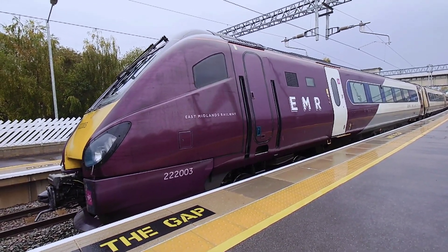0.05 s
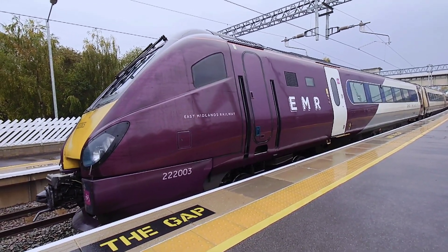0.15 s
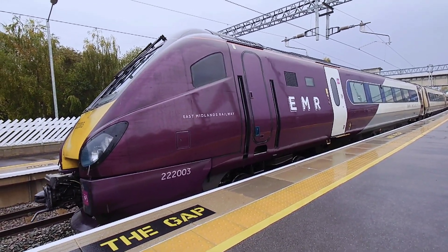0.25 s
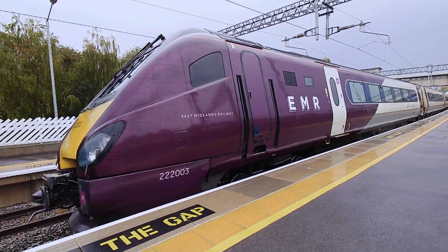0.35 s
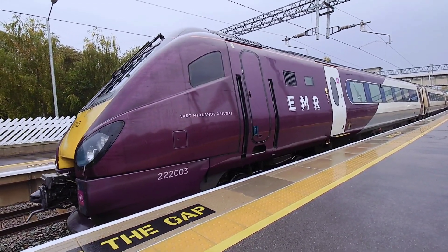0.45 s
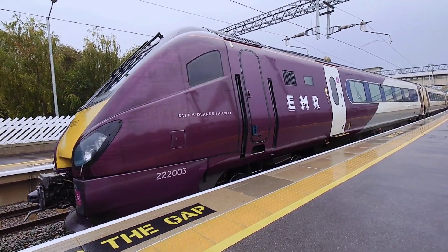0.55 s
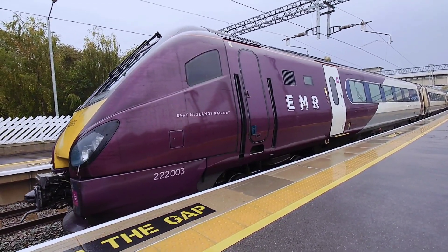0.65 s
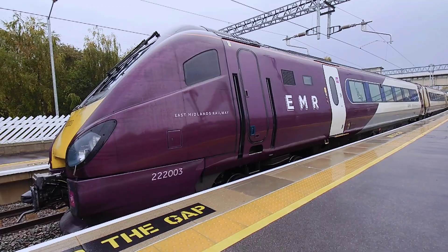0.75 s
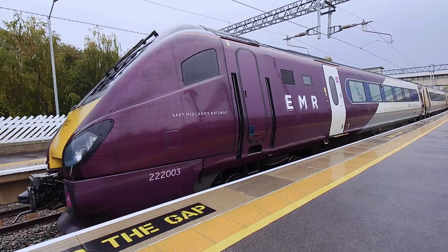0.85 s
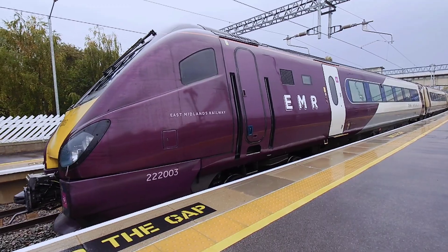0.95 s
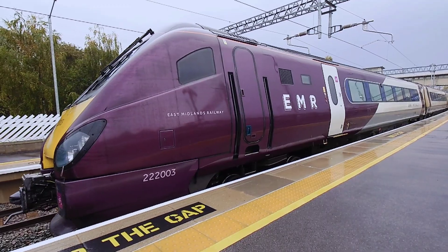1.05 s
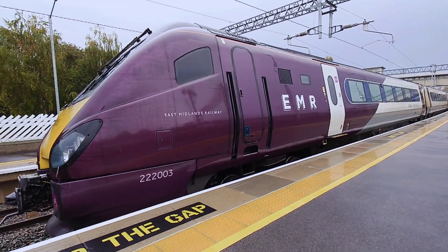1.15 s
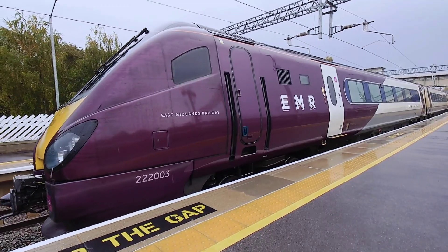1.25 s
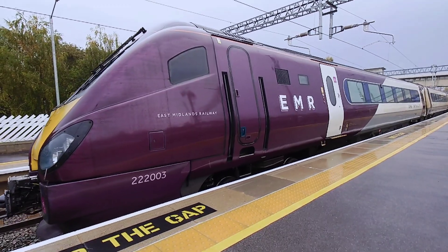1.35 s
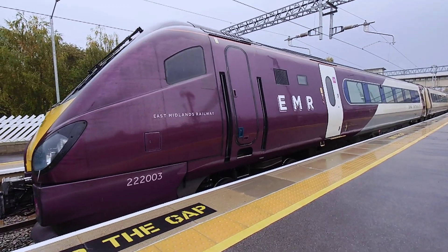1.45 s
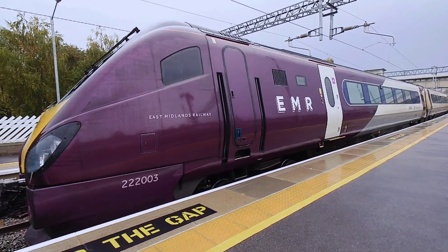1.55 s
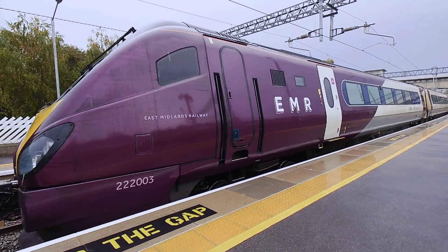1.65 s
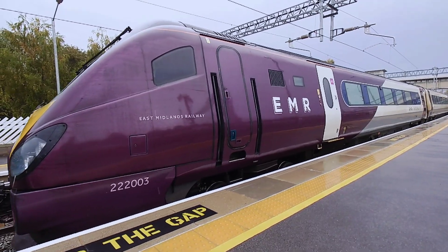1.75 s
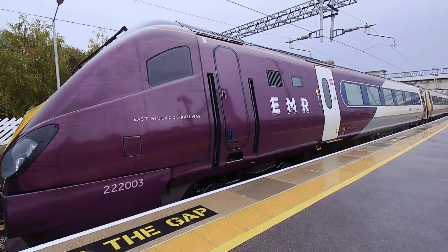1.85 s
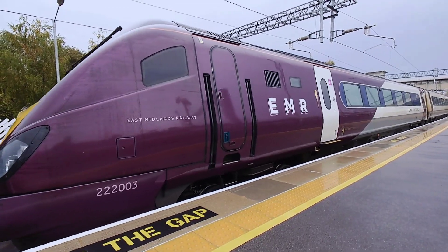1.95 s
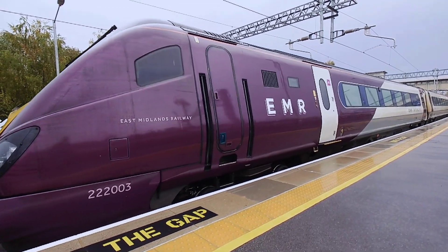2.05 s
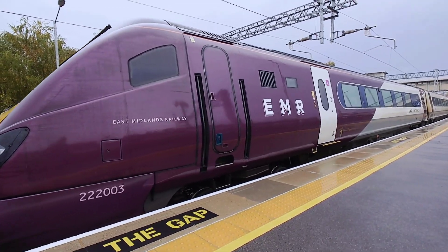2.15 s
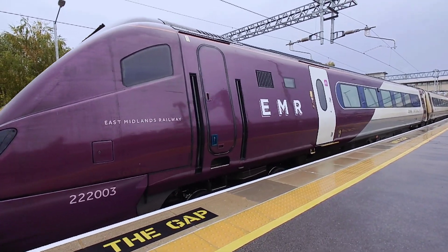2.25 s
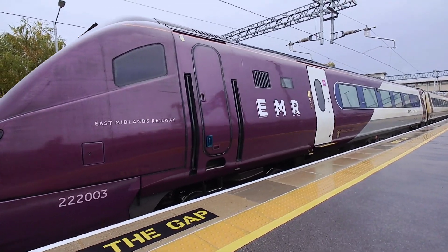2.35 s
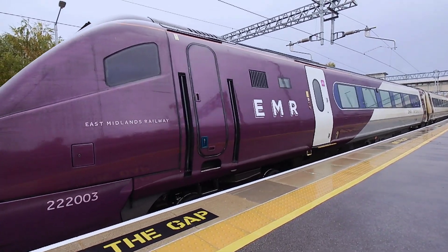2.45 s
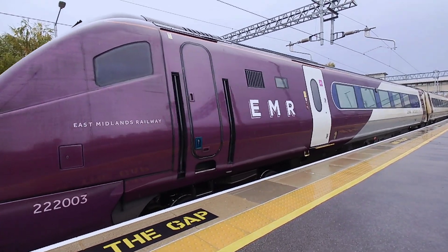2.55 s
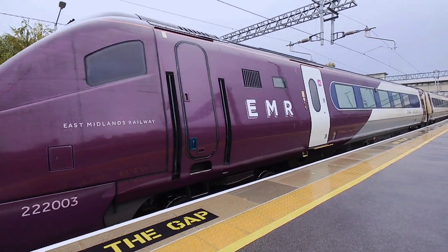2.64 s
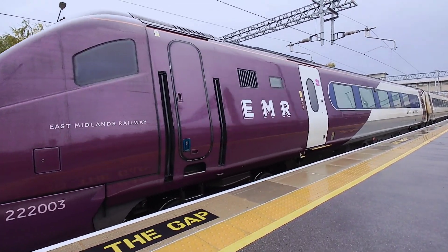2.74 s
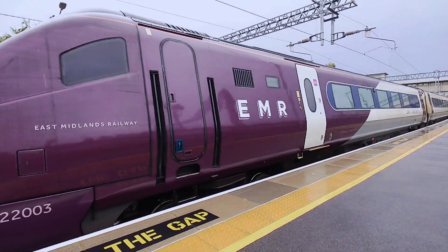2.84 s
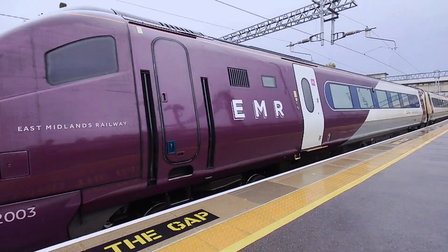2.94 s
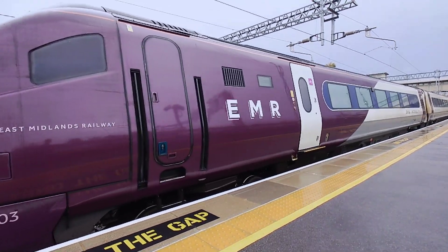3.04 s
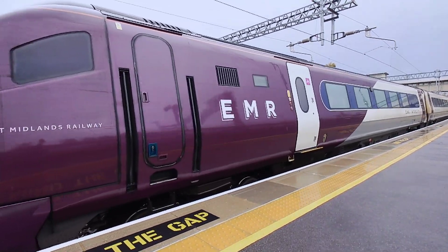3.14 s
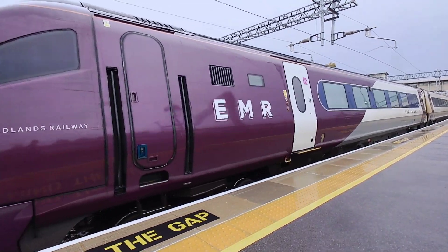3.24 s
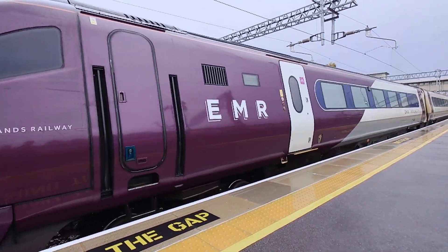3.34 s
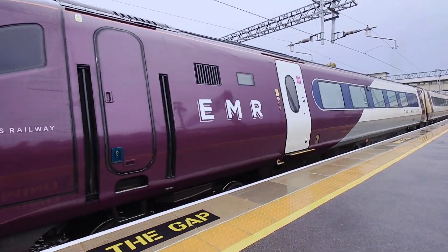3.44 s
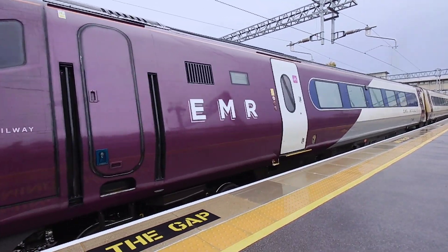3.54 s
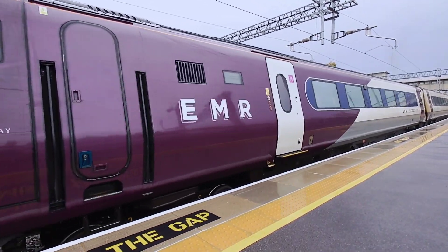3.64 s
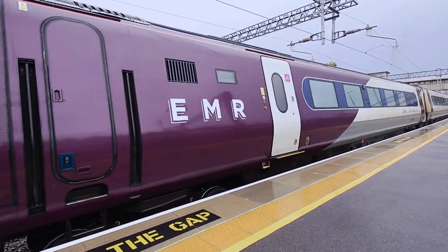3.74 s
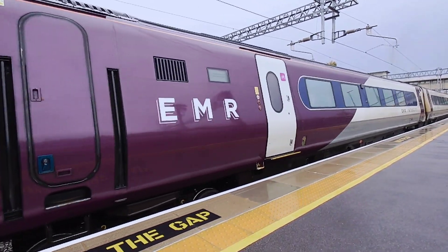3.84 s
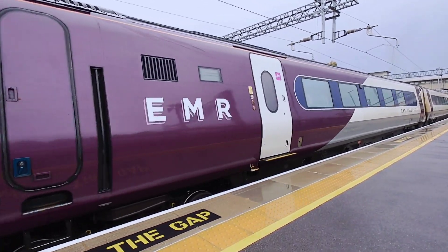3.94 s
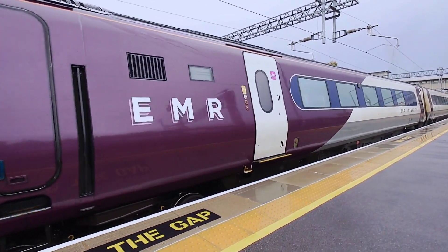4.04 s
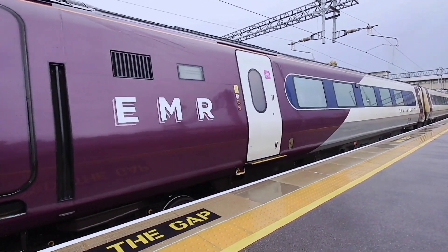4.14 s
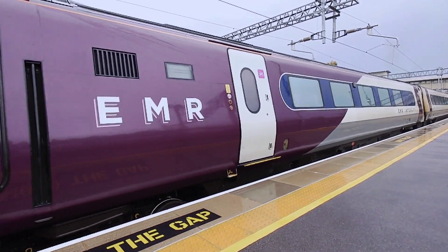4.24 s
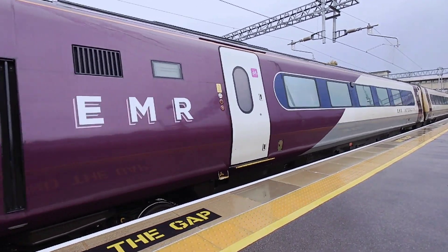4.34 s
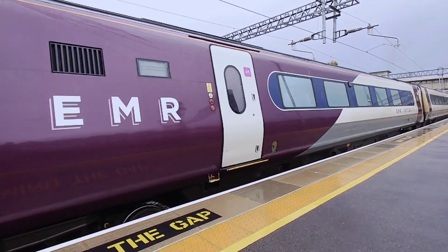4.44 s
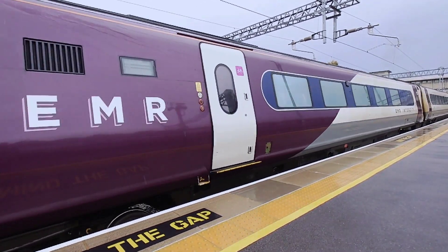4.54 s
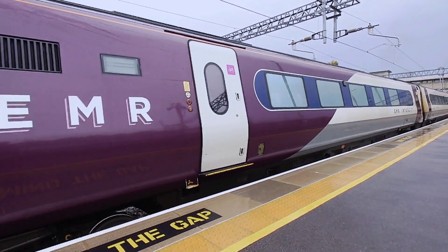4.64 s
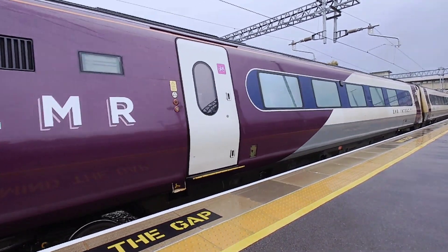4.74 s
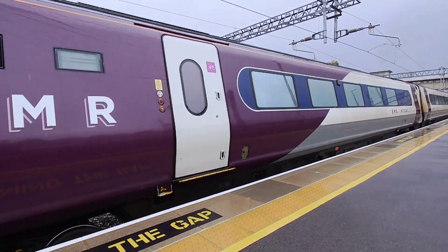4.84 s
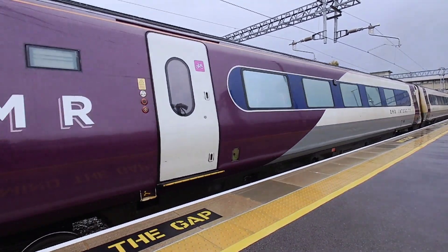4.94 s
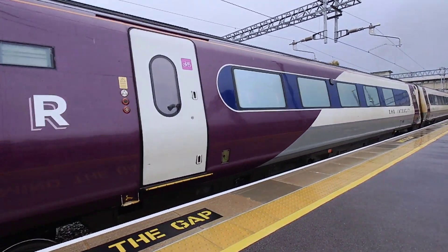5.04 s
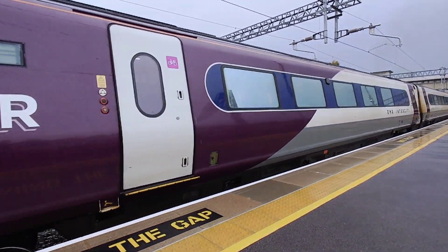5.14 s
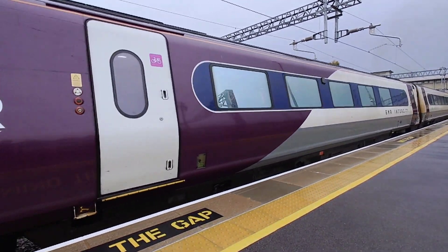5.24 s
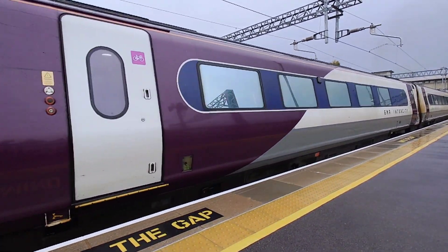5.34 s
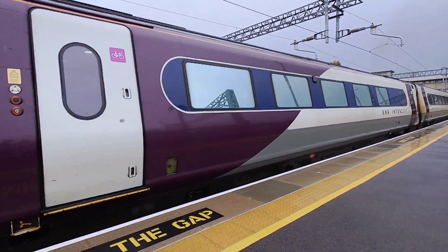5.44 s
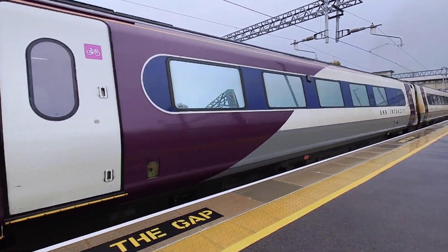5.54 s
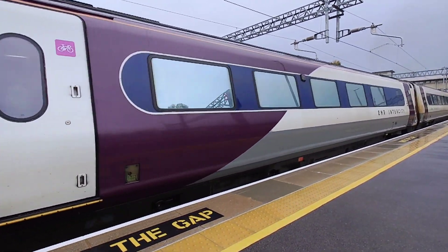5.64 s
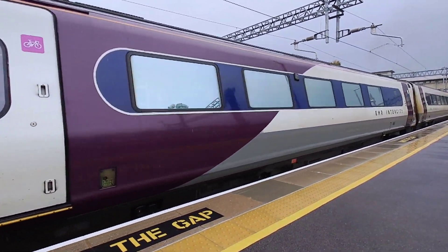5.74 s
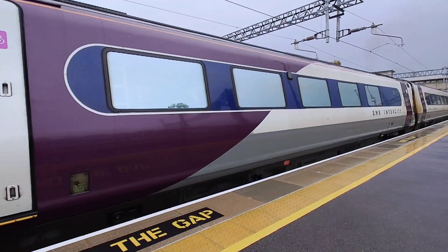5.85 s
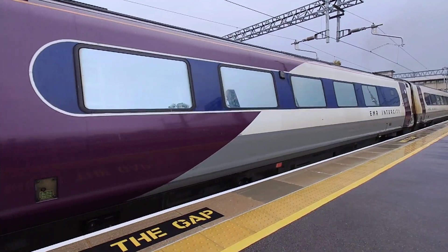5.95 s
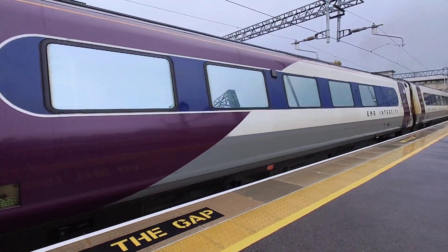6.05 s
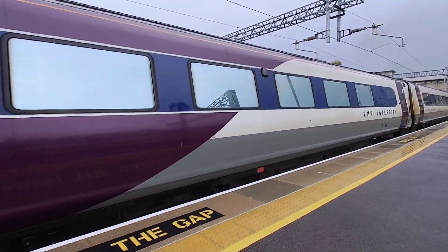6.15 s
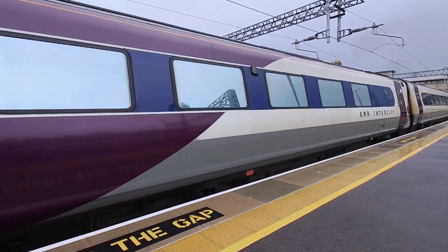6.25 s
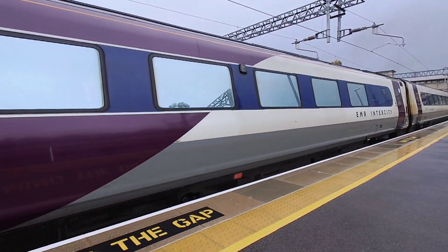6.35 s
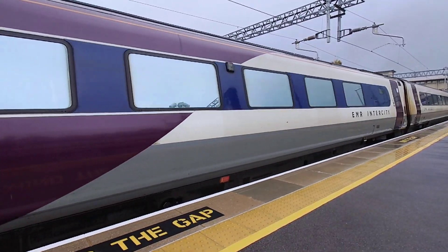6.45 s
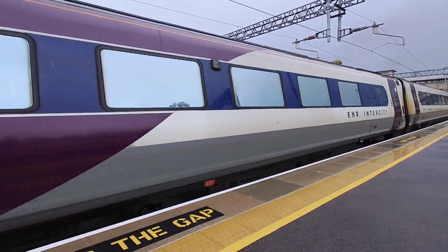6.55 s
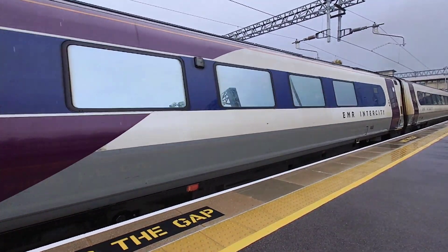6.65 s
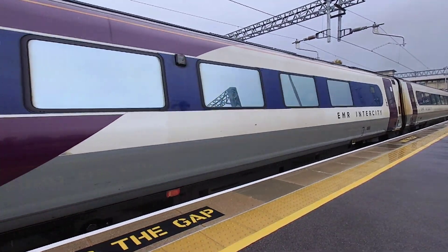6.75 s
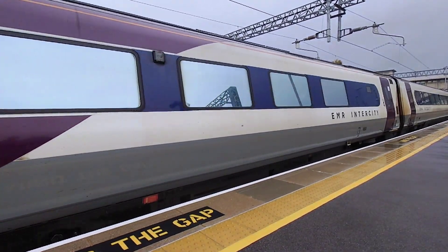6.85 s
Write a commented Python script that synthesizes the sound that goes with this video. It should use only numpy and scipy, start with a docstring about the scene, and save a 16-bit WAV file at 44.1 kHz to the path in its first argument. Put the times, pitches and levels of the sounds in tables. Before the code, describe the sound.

A diesel train idles with a deep drone beside a station platform, close to the microphone. After about a second it revs up, the pitch climbing steadily as the engine's roar and rumble grow louder and nearer. Midway, a short low hum and a brief hiss of air pass by. A faint rising whistle follows, over a steady hum and a thin electrical whine, while the train keeps accelerating.

```python
"""On a station platform, a diesel railcar revs up and pulls out close to a two-port microphone.
The exhaust drones at the rate the cylinders fire, and the engine under the floor roars louder
as it draws near. A slower machine passes with a short low hum, a leaking air fitting hisses by,
and the generator, converter and turbocharger sing above the engines farther down the train."""
import sys
import numpy as np
from scipy import signal
from scipy.fft import rfft, irfft, next_fast_len
from scipy.io import wavfile
from scipy.ndimage import uniform_filter1d

SR = 44100
rng = np.random.default_rng(int(sys.argv[2]) if len(sys.argv) > 2 else 0)


def generate_wav(signal):
    """Clip the signal to [-1, 1] and save it as 16-bit WAV at the path in sys.argv[1]."""
    frames = np.transpose(np.atleast_2d(signal))
    scaled = np.clip(frames, -1, 1) * 32767
    pcm = np.round(scaled).astype(np.int16)
    wavfile.write(sys.argv[1], SR, pcm)


N = 303849
TIME = np.arange(N) / SR


# How often the cylinders fire: t/s, f/Hz
FIRING_RATE = [(0, 56.93), (1, 56.91), (1.5, 58.9), (2, 61.18), (3, 67.05), (3.5, 69.39), (4.3, 71.62),
               (6, 79), (6.89, 83.5)]
# The drone at 1, 2 and 3 times the firing rate: t/s, level/dB, level/dB, level/dB
DRONE_LEVELS = [(0, -22, -43, -34.5), (1.05, -20, -40.5, -27), (1.45, -22.5, -31.5, -34),
                (1.72, -28.5, -30, -29), (1.97, -34, -24, -36), (2.5, -32, -20.5, -25),
                (3.05, -21, -19, -32.5), (3.3, -26.5, -14.5, -24), (3.6, -29, -14, -31),
                (4.0, -23.5, -17.5, -28.5), (4.42, -14.5, -19.5, -32.5), (5.0, -13.5, -16.5, -39.5),
                (5.9, -13, -16.5, -33), (6.4, -21.5, -17.5, -30), (6.89, -21.5, -14.5, -26.5)]
# A second engine's note falls behind the first's: t/s, lag/turns, strength next to the first
SECOND_ENGINE = [(3.4, 0, 0.64), (3.9, .5, .8), (4.5, 1.5, 0.79), (5.36, 2.5, 0.61), (5.79, 3.5, 0.75),
                 (6.13, 4.5, 0.35), (6.4, 5.5, 0.91), (6.65, 6.5, 0.51), (6.89, 7.52, .7)]

def exhaust():
    """Exhaust puffs blend into a drone. A second engine weakens one note when half a turn out of step."""
    turns = np.cumsum(follow(FIRING_RATE)[0]) / SR
    peaks = np.sqrt(2) * amp(follow(DRONE_LEVELS))
    drone = sum(peak * np.cos(2 * np.pi * k * turns) for k, peak in enumerate(peaks, 1))
    lag, strength = follow(SECOND_ENGINE)
    return drone + strength * peaks[1] * np.cos(2 * np.pi * (2 * turns - lag))


# Notes that sound all the time: multiple of the engine cycle, level/dB before the boost
UNEVEN_NOTES = [(4, -47), (8, -54), (10, -44), (14, -41.5), (15, -39), (16, -37), (20, -46.5), (21, -50.5),
                (22, -44), (24, -46), (26, -43.5), (28, -44.5)]
# Boost to those notes and the rumble as the engine works harder: t/s, level/dB
EFFORT_BOOST = [(0, -3), (3.5, 0.5), (4.1, 3.5), (6.89, 5.5)]
# Notes that come and go: loudest t/s, multiple of the engine cycle, half-width/s, level/dB
SWELLING_NOTES = [(.4, 14, 1, -32), (.8, 252, .3, -55), (4.3, 54, .4, -48), (.9, 72, 0.64, -49),
                  (.95, 93, 0.61, -47.5), (4.7, 26, 0.38, -36), (5.12, 84, 0.16, -41.5),
                  (6.3, 168, 0.27, -45.5), (6.45, 22, 0.3, -31), (6.5, 10, 0.37, -24),
                  (6.55, 40, 0.44, -40), (6.56, 84, 0.45, -49), (6.75, 48, .2, -38.5)]

def uneven_cylinders():
    """No two cylinders fire alike, which adds notes at multiples of the whole four-stroke cycle."""
    cycle_hz = follow(FIRING_RATE)[0] / 6  # six firings to a cycle
    lasting = sum(note(k * cycle_hz, db, blur_hz=1.3, waver_db=3) for k, db in UNEVEN_NOTES)
    passing = sum(swell(s, half) * note(k * cycle_hz, db, blur_hz=1.57, waver_db=1.5)
                  for s, k, half, db in SWELLING_NOTES)
    return amp(follow(EFFORT_BOOST)[0]) * lasting + passing


# The tone of the rumble: f/Hz, relative level/dB
RUMBLE_TONE = [(20, -30), (45, -9), (70, 4), (100, 5.5), (150, 5.5), (300, 0), (400, -3.5), (500, -34.5)]

def rumble():
    """A deep noise that grows as the engine works harder."""
    return amp(-29.5 + follow(EFFORT_BOOST)[0]) * noise(RUMBLE_TONE, patchy_db=2)


# The tone of the nearest engine's roar: f/Hz, relative level/dB
ROAR_TONE = [(300, -22), (420, 2.5), (500, -11), (670, -0.5), (870, -13.5), (1080, -0.5), (1350, -13.5),
             (2250, -9), (3040, -18.5), (3500, -13), (4180, -14.5), (15000, -25)]

def near_engine():
    """The engine under the floor gets louder as it revs up and rolls closer."""
    start_m, aside_m, start_m_per_s, speed_up_m_per_s2 = 14.86, 2.92, 0.45, 0.47
    along_m = start_m - start_m_per_s * TIME - 0.5 * speed_up_m_per_s2 * TIME ** 2
    distance_m = np.hypot(aside_m, along_m)
    firing_hz, = follow(FIRING_RATE)
    db_at_1_m = -24 + 0.2864 * (firing_hz - firing_hz[0])
    return amp(db_at_1_m) / distance_m * noise(ROAR_TONE, patchy_db=0.63)


# The pump's two notes: multiple of its pitch, loudest t/s, half-width/s, level/dB
PUMP_HUM = [(1, 3.93, 0.24, -20.5), (3, 4.15, 0.13, -20.5)]

def pump():
    """A slower machine under the floor hums briefly as it passes, speeding up."""
    hz = 60.8 + 12.5 * (TIME - 3.95)
    return sum(swell(s, half) * note(k * hz, db, blur_hz=0.53) for k, s, half, db in PUMP_HUM)


# The tone of the hiss: f/Hz, relative level/dB
HISS_TONE = [(300, -30), (650, 4.5), (4000, -7.5), (15000, -13)]
# The leak's whistles: f/Hz when nearest, width/Hz, level/dB before the passing swell
LEAK_WHISTLES = [(3850, 160, -54), (7930, 190, -48), (10070, 170, -47), (14150, 300, -45)]

def air_leak():
    """Air hisses out of a fitting. Its whistles are loudest and dip in pitch when it is nearest."""
    full_s, shaded_s, nearest_s = 4.01, 4.24, 4.16
    rise_db = -51 * np.maximum(full_s - TIME, 0)
    fall_db = -95 * np.maximum(TIME - shaded_s, 0)
    air = amp(-34.5 + rise_db + fall_db) * noise(HISS_TONE, patchy_db=1)
    closeness = 1 / (1 + ((TIME - nearest_s) / 0.05) ** 2)
    bend = 1 + 0.012 * (1 - closeness)
    passing = amp(5) * np.sqrt(closeness) * swell(nearest_s, 0.55)
    for hz, width_hz, db in LEAK_WHISTLES:
        air += amp(db) * passing * fuzzy_whistle(hz * bend, width_hz)
    return air


# The generator's lasting notes: multiple of its pitch, level/dB
GENERATOR_NOTES = [(1, -41), (2, -55), (4, -53), (5, -60), (6, -61)]
# Swells added to them: multiple of its pitch, loudest t/s, half-width/s, level/dB
GENERATOR_SWELLS = [(1, 1.7, 0.24, -39.5), (4, 3.7, 0.18, -48.5), (4, 4.6, .25, -50), (2, 4.9, .6, -52),
                    (5, 4.7, 0.15, -47.5), (5, 5.52, 0.38, -50), (1, 5.73, 0.17, -34.5),
                    (4, 5.87, 0.26, -53), (4, 6.33, .15, -38), (1, 6.55, 0.46, -33.5)]

def generator(pitch_hz=380.2):
    """The generator hums at one pitch, and its notes swell now and then."""
    hum = np.zeros(N)
    for k, steady_db in GENERATOR_NOTES:
        swells = sum(amp(db) * swell(s, half) for m, s, half, db in GENERATOR_SWELLS if m == k)
        hum += (amp(steady_db) + swells) * note(k * pitch_hz, 0, blur_hz=1, waver_db=2)
    return hum


# The converter's high notes: f/Hz, level/dB before the load is added
CONVERTER_NOTES = [(2702, -60), (5400, -59), (8115, -64), (13530, -62)]
# How the load turns them up: t/s, added level/dB
LOAD_BOOST = [(.5, -9), (3, 0), (5, 1)]

def converter():
    """The power converter's thin whine comes up with the load."""
    load_db, = follow(LOAD_BOOST)
    return sum(note(hz, db + load_db, blur_hz=12, waver_db=3) for hz, db in CONVERTER_NOTES)


# How loud the turbocharger is: t/s, level/dB
TURBO_LEVEL = [(4.3, -66), (4.8, -51.5), (5.5, -50.5), (5.8, -62), (6.89, -50)]

def turbocharger():
    """The turbocharger gives a faint whistle that climbs steadily in pitch."""
    hz = 4440 + 690 * (TIME - 4.8)
    return note(hz, follow(TURBO_LEVEL)[0], blur_hz=16, waver_db=2.5)


# The tone of the engines down the train: f/Hz, relative level/dB
FAR_TONE = [(300, -5.5), (420, 0.5), (530, -8), (700, -4), (900, -4.5), (1400, -18.5), (1690, -4.5),
            (1990, -21), (2350, -10), (2900, -20.5), (3380, -12), (3750, -19.5), (15000, -36)]

def far_engines():
    """The engines down the train blend into a rush that slowly grows."""
    return amp(-39 + 0.43 * TIME) * noise(FAR_TONE, patchy_db=0.9)


# The left port next to the right: f/Hz, noise likeness (0-1), level/dB, head start/radians
LEFT_PORT = [(50.2, 0.98, 6, 1.06), (73.6, 0.9, 5.5, -0.07), (114.6, 0.72, -2, 1.22),
             (186, 0.99, -3, -1.18), (371, 1, -3, 0.8), (513, 0.45, -3, -1.25), (676, 0.76, 0, 0.5),
             (883, 0.54, -0.5, -2), (1510, 0.61, -2.5, 4), (2560, 0, -4, 5.5), (3230, 0.55, -1.5, 10),
             (5850, 0, -9, 18), (7200, .1, -27.5, 24), (11000, .1, -14.5, 33.5)]
# How the microphone colours the high sounds: f/Hz, level/dB
MIC_TONE = [(4000, 0.5), (5000, -0.5), (5700, -6.5), (6500, -6.5), (7050, -11), (8000, -3), (9300, -2.5),
            (10400, -8.5), (12700, -5), (15500, -7.5)]

def microphone(notes, noises):
    """Two openings, or ports: the left hears a shaded, shifted, partly unrelated version of the right."""
    size = next_fast_len(N)
    hz = np.fft.rfftfreq(size, 1 / SR)
    likeness, left_db, lead = over_pitch(LEFT_PORT, hz)
    left_gain = amp(left_db) * np.exp(1j * lead)
    tones = rfft(notes, size)
    shared, separate = rfft(noises, size)
    left = left_gain * (tones + likeness * shared + np.sqrt(1 - likeness ** 2) * separate)
    right = tones + shared
    # keeps the noise level in the average of the two ports
    balance = 2 / np.sqrt(1 + abs(left_gain) ** 2 + 2 * likeness * left_gain.real)
    colour = amp(over_pitch(MIC_TONE, hz)[0])
    return irfft(colour * balance * np.array([left, right]), size)[:, :N]


def amp(db):
    """Turns decibels into a number to multiply by."""
    return 10 ** (np.asarray(db) / 20)


def evened(x):
    """Scales a signal to an average strength (rms) of 1."""
    return x / np.sqrt(np.mean(x ** 2) + 1e-20)


def over_pitch(rows, hz):
    """Fills in a table's columns between its frequencies, on a log scale."""
    f, *columns = np.transpose(rows)
    return [np.interp(np.log(hz + 1), np.log(f + 1), c) for c in columns]


def follow(rows):
    """Fills in a table's columns between its times."""
    s, *columns = np.transpose(rows)
    return [np.interp(TIME, s, c) for c in columns]


def swell(centre_s, half_width_s):
    """A bell-shaped rise and fall."""
    return np.exp(-((TIME - centre_s) / half_width_s) ** 2)


def drift(pace):
    """A random wander; a higher pace turns it more quickly."""
    kicks = rng.standard_normal(N // 400 + 40)
    steps = signal.lfilter([1], [1, -np.exp(-pace / 20)], kicks)[38:]
    return evened(np.interp(np.arange(N) / 400, np.arange(len(steps)), steps))


def note(hz, db, blur_hz=0, waver_db=0):
    """A pure tone whose pitch and level may wander."""
    turns = np.cumsum(hz + blur_hz * drift(7.82)) / SR + rng.random()
    return np.sqrt(2) * amp(db + waver_db * drift(4.6)) * np.sin(2 * np.pi * turns)


def fuzzy_whistle(hz, width_hz):
    """Two unrelated narrow bands of noise around one pitch."""
    decay = np.exp(-np.pi * width_hz / SR)
    slow = signal.lfilter([1], [1, -2 * decay, decay ** 2], rng.standard_normal((4, N)))
    spin = np.exp(2j * np.pi * np.cumsum(hz) / SR)  # lifts the slow noise up to the pitch
    return evened(((slow[:2] + 1j * slow[2:]) * spin).real)


def noise(tone, patchy_db):
    """Two unrelated noises of the same tone, with drifting louder and softer patches."""
    frames, hz = N // 256 + 5, np.fft.rfftfreq(1024, 1 / SR)
    a, b, c, d, patches = rng.standard_normal((frames, 513, 5)).T
    patches = uniform_filter1d(patches, size=10, axis=0)  # smooth across pitch
    patches = evened(uniform_filter1d(patches, size=16, axis=1))  # and across time
    level_db = over_pitch(tone, hz)[0][:, None] + patchy_db * patches
    spectra = np.array([a + 1j * b, c + 1j * d]) * amp(level_db)
    return evened(signal.istft(spectra, nperseg=1024, noverlap=768)[1][:, :N])


def scene():
    """All the train's notes and noises reach the microphone."""
    notes = exhaust() + uneven_cylinders() + pump() + generator() + converter() + turbocharger()
    noises = rumble() + far_engines() + near_engine() + air_leak()
    return microphone(notes, noises)


def record(dry):
    """Rounds off the loudest peaks, then cuts the very highest sounds."""
    ceiling, top_hz = 1.38, 15745
    rounded = ceiling * np.tanh(dry / ceiling)
    low_pass = signal.firwin(1023, top_hz, window=("kaiser", 9), fs=SR)
    return signal.oaconvolve(rounded, low_pass[None], "same")


dry = scene()
out = record(dry)
generate_wav(out)
```